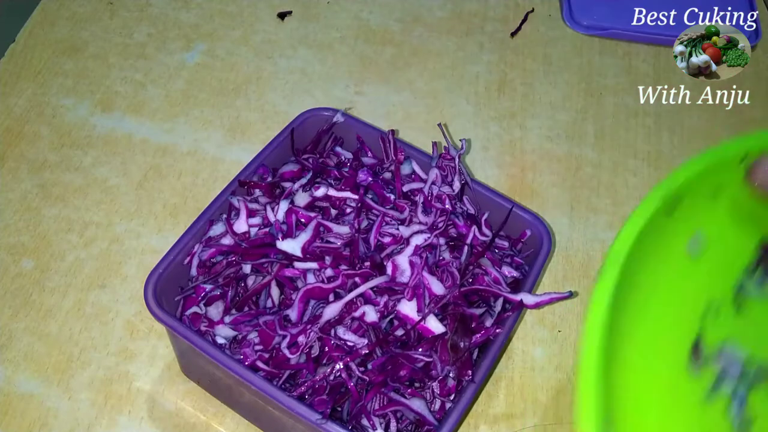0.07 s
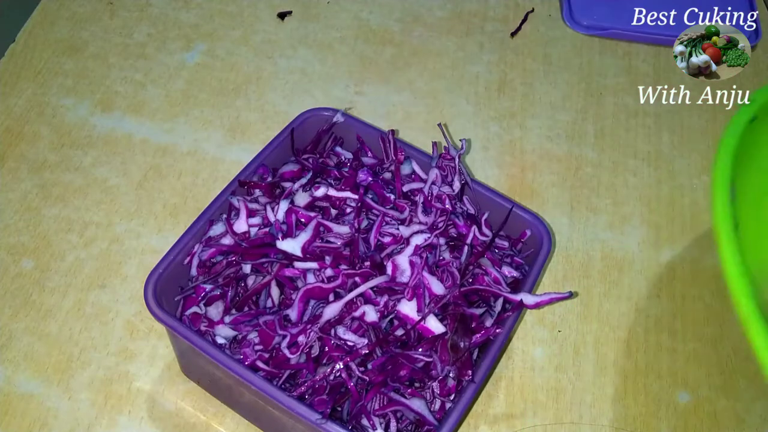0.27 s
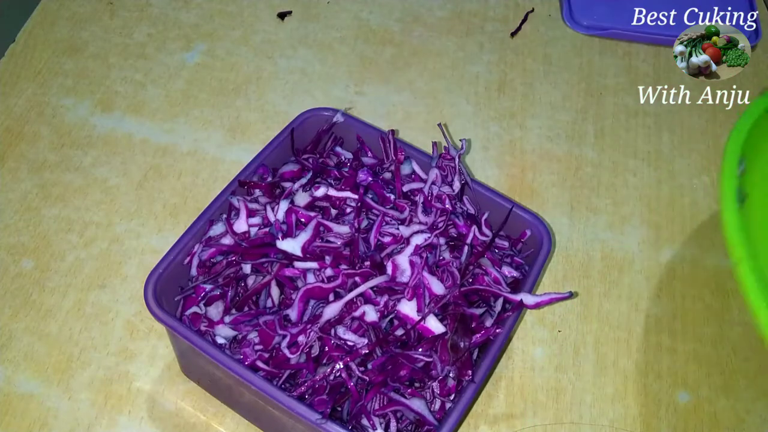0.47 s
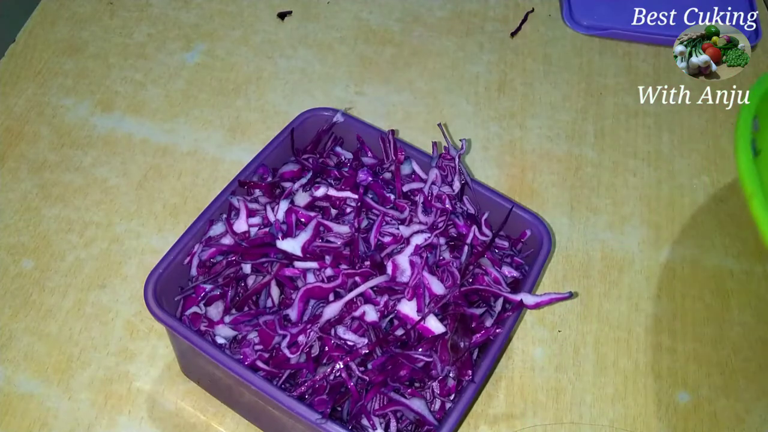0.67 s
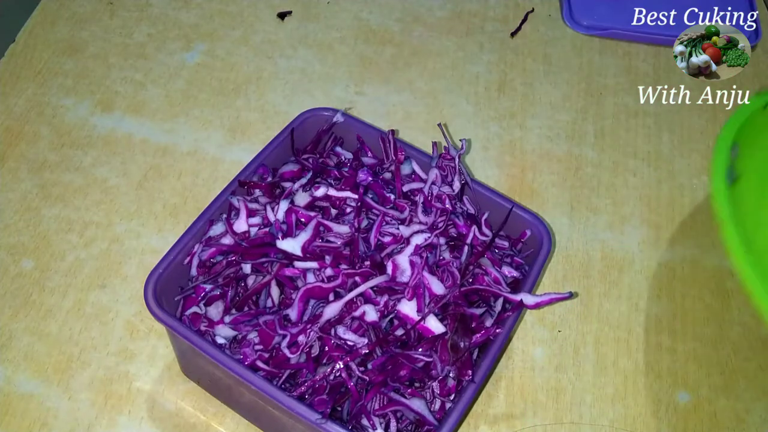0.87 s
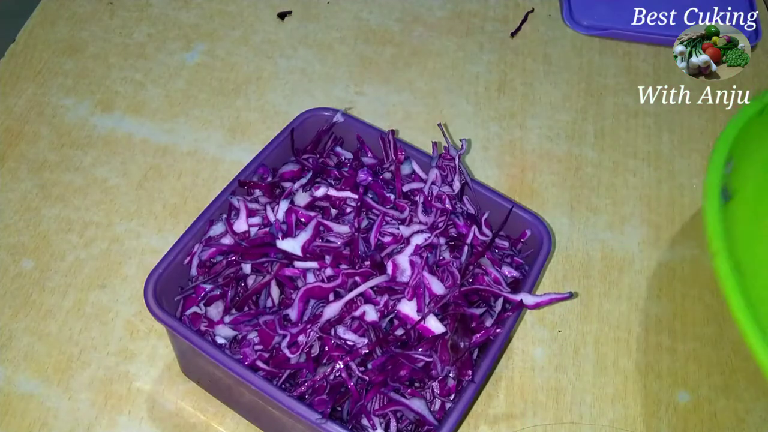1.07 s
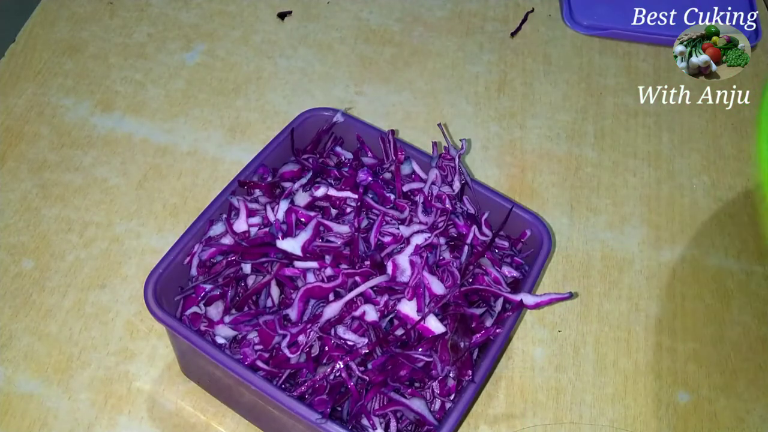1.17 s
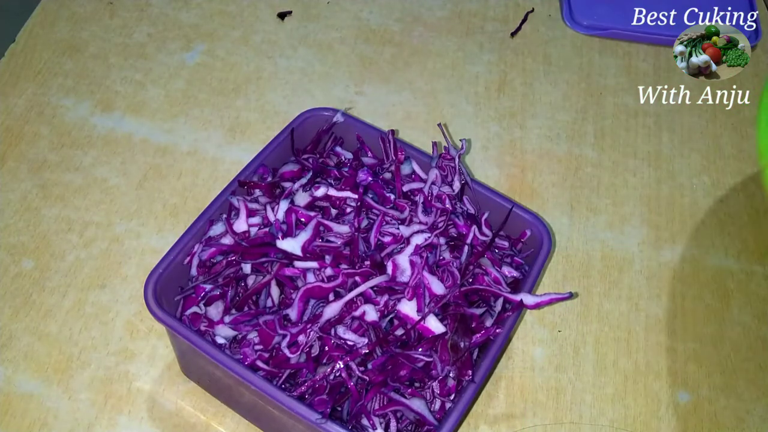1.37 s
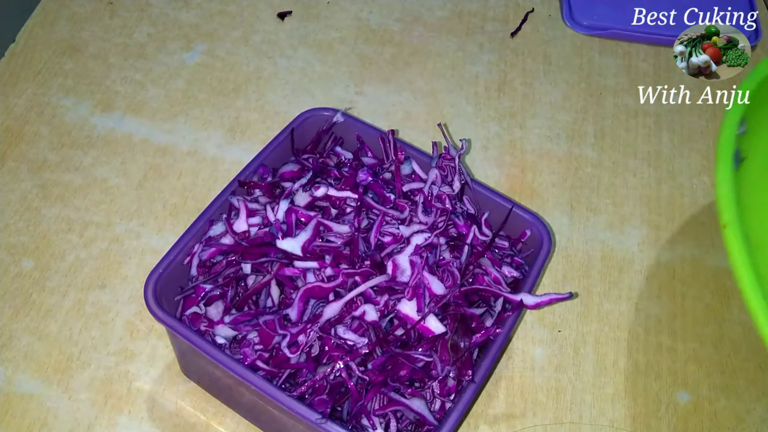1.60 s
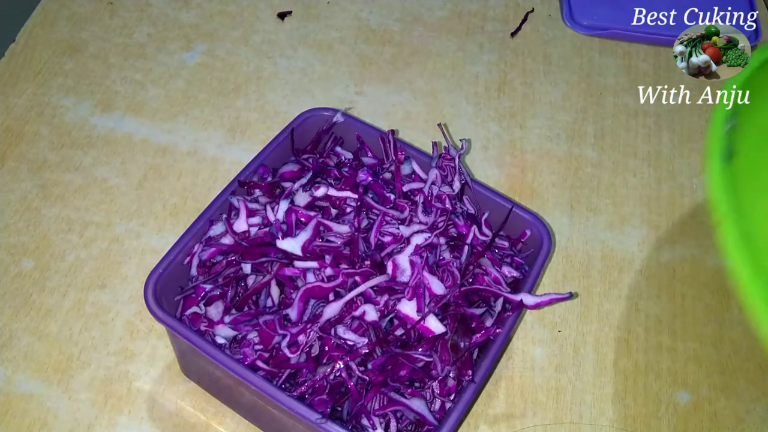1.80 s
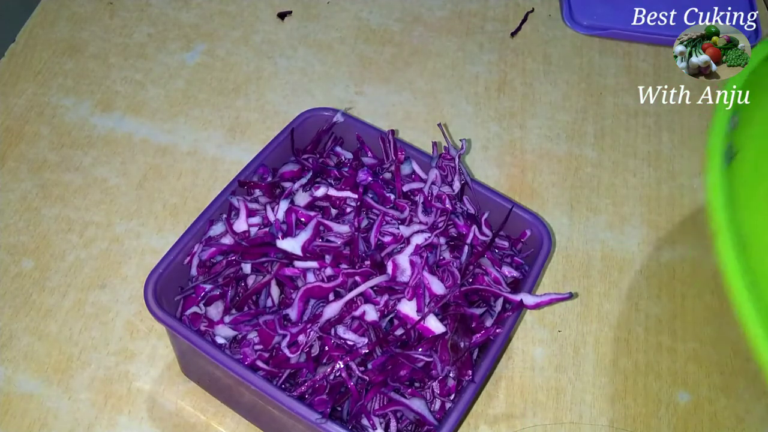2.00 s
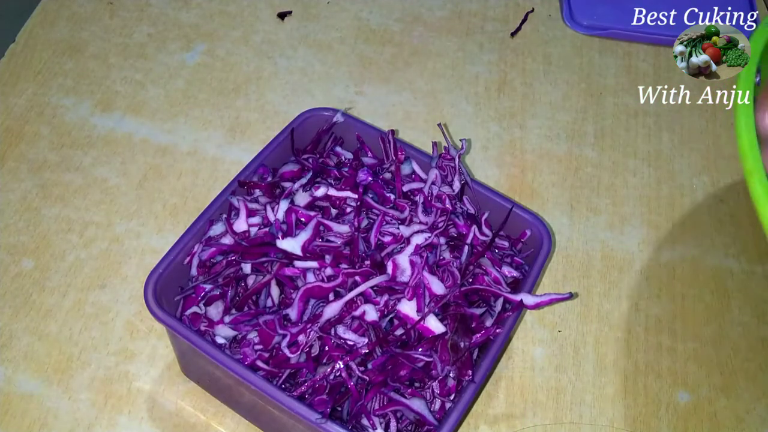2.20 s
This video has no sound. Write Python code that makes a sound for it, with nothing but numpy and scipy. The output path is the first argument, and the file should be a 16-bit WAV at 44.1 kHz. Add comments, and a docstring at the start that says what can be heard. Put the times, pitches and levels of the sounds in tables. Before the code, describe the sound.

Shredded cabbage scraped across a table into a plastic bowl in four gritty strokes, with knocks.

```python
"""Shredded cabbage is swept across a table and into a plastic bowl, in a quiet, humming kitchen.
First the bowl bumps softly on the table and its thin wall is tapped. Then come four strokes, each a
gritty scrape with a hiss above it, made by shreds that stick and slip. Along the way the bowl knocks,
the table rumbles and rubbed plastic sings hollow notes. Two ticks and a few faint notes end the scene.
All of this is in the left channel; the right holds only faint noise."""
import sys
import numpy as np
from scipy import signal
from scipy.fft import rfft, irfft
from scipy.io import wavfile

SR = 44100
rng = np.random.default_rng(int(sys.argv[2]) if len(sys.argv) > 2 else 0)


def wrap_up_sound(samples):
    """Save the sound to the file named by the first command line argument, as 16-bit audio."""
    columns = np.atleast_2d(samples).T
    # keep every value between -1 and 1, then stretch to whole-number steps
    tamed = np.clip(columns, -1, 1)
    steps = np.round(tamed * 32767).astype(np.int16)
    wavfile.write(sys.argv[1], SR, steps)


N = 99225
T, HZ = np.arange(N) / SR, np.fft.rfftfreq(N, 1 / SR) + 1e-3


def amp(db):
    """Turns decibels into a gain."""
    return 10 ** (np.asarray(db) / 20)

def unit(x):
    """Scales a signal to an average (rms) level of 1."""
    return x / np.sqrt(np.mean(x ** 2) + 1e-30)

def read(points, hz):
    """Looks up a table between its rows, on a log-frequency axis."""
    row_hz, value = np.transpose(points)
    return np.interp(np.log(hz + 1), np.log(row_hz + 1), value)

def add(mix, start_s, sound):
    """Mixes a sound in at its start time."""
    part = mix[max(round(start_s * SR), 0):][:len(sound)]
    part += sound[:len(part)]

def shaped(x, gain):
    """Filters by a gain per frequency, then scales to level 1."""
    return unit(irfft(rfft(x) * gain, N))

def above(edge_hz, order=8):
    """Gain that keeps what is above the edge; a negative order keeps what is below."""
    return 1 / np.sqrt(1 + (edge_hz / HZ) ** order)

def wander(rate_hz):
    """Smooth random motion."""
    return unit(signal.sosfilt(signal.butter(2, rate_hz, fs=SR, output="sos"), rng.standard_normal(N)))

def wobble(rate_hz):
    """Random size and phase, to blur a tone into a band of noise."""
    return wander(rate_hz) + 1j * wander(rate_hz)

def swell(peak_s, rise_s, fall_s):
    """A rounded rise and fall."""
    return np.exp(-((T - peak_s) / np.where(T < peak_s, rise_s, fall_s)) ** 2)

def fade(t, ring_s):
    """Dies away by 60 dB in ring_s."""
    return np.exp(-np.log(1000) * t / ring_s)


# tone of the faint background noise, with its highest treble cut away: frequency_hz, gain_db
NOISE_TONE = [(25, -12), (60, -4), (110, 3.5), (160, 3.5), (210, -3.5), (300, -9), (450, -9), (700, -15.5),
              (1500, -20.5), (3000, -28), (6000, -28), (11000, -27.5), (13000, -38), (15000, -62)]
# how loud the low rumble is: time_s, level_db
RUMBLE_LEVELS = [(0, -65), (.14, -75), (.185, -50), (.24, -80), (.63, -88), (.74, -62.5), (.91, -62),
                 (1.15, -69.5), (1.3, -58.5), (1.52, -65), (1.7, -58), (1.9, -70), (2.25, -72)]

def background(hum_hz=147.2, rumble_hz=63.6, rumble_width_hz=23):
    """Faint background noise, a low rumble and a wavering appliance hum."""
    noise = amp(-64.5) * shaped(rng.standard_normal(N), amp(read(NOISE_TONE, HZ)))
    low_band = 1 / (1 + ((HZ - rumble_hz) / rumble_width_hz * 2) ** 2)
    rumble = amp(np.interp(T, *np.transpose(RUMBLE_LEVELS))) * shaped(rng.standard_normal(N), low_band)
    hum = amp(-62.5 + 2.1 * wander(3.4)) * unit(np.sin(2 * np.pi * hum_hz * T))
    return noise + rumble + hum


# tone of the right channel: frequency_hz, gain_db
IDLE_TONE = [(25, -118), (48, -94.5), (65, -87), (145, -90.5), (200, -95), (500, -99), (1200, -102),
             (3200, -102), (6000, -106), (11000, -109), (15000, -117)]

def idle_noise():
    """Faint, steady noise in the channel that the microphone does not feed."""
    return amp(-74.5) * shaped(rng.standard_normal(N), amp(read(IDLE_TONE, HZ)))


# the bowl bumps on the table: start_s, level_db, pitch_hz, ring_s
BOWL_BUMPS = [(0.001, -46.5, 228.6, 0.23), (.022, -50, 283, 0.1), (.065, -50, 210, 0.19),
              (.11, -52, 211, 0.31), (.159, -37, 253.5, 0.088), (.174, -40, 276, 0.075),
              (0.202, -35.5, 214, 0.055)]

def bumps(rise_s=0.004):
    """Dull low notes as the bowl is moved aside."""
    out = np.zeros(N)
    for start_s, level_db, pitch_hz, ring_s in BOWL_BUMPS:
        note = fade(T, ring_s) * np.sin(2 * np.pi * pitch_hz * T)
        add(out, start_s, amp(level_db) * np.minimum(T / rise_s, 1) * note)
    return out


# light taps on the bowl: start_s, level_db
WALL_TAPS = [(0.16, -51.5), (.174, -50.5)]
# notes its wall rings with: pitch_hz, gain_db, ring_s
WALL_NOTES = [(1350, -1, 0.062), (1440, -12, .05), (2110, -8, 0.047), (2550, -10, .05), (3890, -13, 0.16),
              (4850, -9, 0.062), (5570, -6, 0.048), (7800, -3.5, 0.1), (10100, -10, 0.1)]

def taps(rise_s=0.004):
    """Soft touches ring the thin wall of the bowl, each with a scuff of noise."""
    out, t = np.zeros(N), T[T < .2]
    for start_s, level_db in WALL_TAPS:
        ring = sum(amp(gain_db) * fade(t, ring_s) * np.sin(2 * np.pi * (pitch_hz * t + rng.random()))
                   for pitch_hz, gain_db, ring_s in WALL_NOTES)
        scuff = 0.51 * rng.standard_normal(len(t)) * fade(t, ring_s=0.077)
        add(out, start_s, amp(level_db) * np.minimum(t / rise_s, 1) * (ring + scuff))
    return out


# pitches that the bowl makes louder: pitch_hz, width_hz, boost_db
BOWL_RESONANCES = [(688, 140, 11.5), (1080, 200, 3.5), (1314, 46, 3.5), (1800, 180, 1.5), (2250, 300, 4),
                   (2630, 68, 7.5)]

def bowl_hits(rows, size=4096):
    """Each hit is a click and a short rattle, coloured by the bowl."""
    out, t = np.zeros(N), np.arange(size) / SR
    hz = abs(np.fft.fftfreq(size, 1 / SR)) + 1
    bowl_db = sum(boost_db / (1 + (2 * (hz - pitch_hz) / width_hz) ** 2)
                  for pitch_hz, width_hz, boost_db in BOWL_RESONANCES)
    for start_s, peak_db, pitch_hz, width_octaves, ring_s in rows:
        off_pitch_db = -20 * (np.hypot(1, np.log2(hz / pitch_hz) / width_octaves * 1.27) + 0.5)
        log_gain = np.log(amp(bowl_db + off_pitch_db) + 1e-4)
        response = np.exp(np.conj(signal.hilbert(log_gain)))  # rings after the click, not before
        rattle = rng.standard_normal(size) * fade(t, ring_s)
        contact = (t == 0) + 0.6 * rattle / np.linalg.norm(rattle)
        hit = np.fft.ifft(response * np.fft.fft(contact)).real
        add(out, start_s, -amp(peak_db) * hit / abs(hit).max())
    return out


# shreds hit the bowl: start_s, peak_db, pitch_hz, width_octaves, ring_s
SHRED_TICKS = [(.16, -38.5, 7860, 0.71, .07), (.644, -40.5, 6900, 1, 0.023), (.689, -36, 6100, 0.77, 0.05),
               (2.07, -43, 6000, 0.74, 0.021), (2.155, -51.5, 4900, 0.33, 0.066)]

def ticks():
    """Shreds strike the plastic with small, bright ticks."""
    return bowl_hits(SHRED_TICKS)


def slips(spread_db, per_second=9000):
    """Shreds stick and slip, making a stream of tiny, uneven clicks."""
    size = amp(spread_db * np.minimum(rng.exponential(1, N), 4))
    return size * rng.choice([-1., 1.], N) * (rng.random(N) < per_second / SR)

def echoes(count=6, longest_s=0.007, level_db=-13):
    """Quick echoes off the table and bowl lift some frequencies and weaken others."""
    delay_s = longest_s * rng.uniform(0.107, 1, (count, 1))
    bounces = rng.choice([-1, 1], (count, 1)) * np.exp(-2j * np.pi * HZ * delay_s)
    return abs(1 + amp(level_db) / np.sqrt(count) * bounces.sum(0))


# loudness, one list per stroke: time_s, scrape_db, hiss_db
STROKE_LEVELS = [
    [(.2, -55.5, -61), (.225, -41, -55.5), (.25, -41.5, -45.5), (.31, -35.5, -34), (.4, -37.5, -38),
     (.49, -38.5, -40.5), (.57, -43, -52.5), (.625, -46.5, -59.5), (.69, -45.5, -69), (.725, -56.5, -63),
     (.78, -62, -78)],
    [(.78, -68, -71.5), (.83, -58.5, -54), (.87, -58, -54), (.91, -55.5, -49), (1.04, -51.5, -45),
     (1.09, -50.5, -50.5), (1.14, -59, -64.5), (1.18, -72, -77)],
    [(1.294, -69, -66), (1.302, -50, -44.5), (1.34, -55.5, -55.5), (1.4, -46, -44.5), (1.46, -45, -42),
     (1.535, -44, -42), (1.59, -44.5, -47.5), (1.63, -51, -54.5), (1.68, -60.5, -61.5), (1.74, -79, -90)],
    [(1.74, -58.5, -102), (1.79, -51, -68), (1.825, -54, -71.5), (1.86, -47.5, -48), (1.92, -44, -41),
     (1.965, -41, -43), (1.99, -48, -48), (2.03, -54, -54.5), (2.1, -72.5, -74.5), (2.22, -81, -100)],
]
# tone, one list per stroke: frequency_hz, gain_db
STROKE_TONES = [
    [(180, -44), (300, 0), (437, 12), (507, -14), (541, 6), (691, 2), (750, 1), (1350, 1), (1670, -3),
     (2780, -8.5), (5800, -16.5), (10100, -14.5), (15000, -24)],
    [(290, -65), (500, -32), (593, 1), (655, -32), (835, -40), (949, -4), (1030, -39), (1190, 2), (1260, 1),
     (1610, -12), (1770, 0.5), (2020, -5), (2360, -0.5), (3140, -11), (3370, -7), (4670, -11.5),
     (5780, -14.5), (10200, -12), (15000, -19)],
    [(180, -42), (300, -20), (359, -20), (390, -4), (437, 18), (559, -9), (597, -8), (637, -4), (855, -10),
     (898, -36), (975, -3), (1210, -10.5), (1420, -2), (1700, -4), (2480, -6.5), (4180, -10.5), (8050, -13),
     (10500, -9.5), (15000, -21)],
    [(180, -52), (300, -25), (444, 1), (498, -5), (587, 13), (738, -34), (828, -31), (898, -4.5),
     (1060, -5), (1910, -5.5), (2250, -6.5), (2920, -7), (5530, -13), (9800, -13), (15000, -20)],
]

def strokes(scrape_low_hz=800, hiss_low_hz=3560, top_hz=11600, judder_hz=70, judder_db=0.99):
    """Slipping shreds make a scrape and a hiss that dulls as the hand slows; both judder."""
    out = np.zeros(N)
    for levels, tone in zip(STROKE_LEVELS, STROKE_TONES):
        time_s, scrape_db, hiss_db = np.transpose(levels)
        scrape_db, hiss_db = np.interp(T, time_s, scrape_db), np.interp(T, time_s, hiss_db)
        colour = amp(read(tone, HZ)) * echoes()
        grit = unit(rng.uniform(-0.98, 1, N) * (rng.random(N) < 260 / SR))  # larger catches
        scrape_band = above(scrape_low_hz, order=12) * above(hiss_low_hz, order=-8)
        scrape = shaped(unit(slips(spread_db=4)) + amp(-8) * grit, colour * scrape_band)
        hiss = shaped(slips(spread_db=2), colour * above(hiss_low_hz))
        top = irfft(rfft(hiss) * above(top_hz, order=16) ** 2, N)
        hiss -= top * (1 - amp(0.2 * (hiss_db - hiss_db.max())))  # the highest part fades fastest
        out += (scrape * amp(scrape_db) + hiss * amp(hiss_db)) * (T > time_s[0]) * (T < time_s[-1])
    return out * amp(judder_db * wander(judder_hz))

def drifting(x, depth_db=2.5, patch_hz=190, patch_s=0.083, size=1024):
    """The tone shifts in random patches as the contact moves over the surface."""
    hz, t, spectrum = signal.stft(x, SR, nperseg=size)
    blur_hz = np.exp(-((hz[:, None] - hz) / patch_hz * 2) ** 2)
    blur_time = np.exp(-((t[:, None] - t) / patch_s) ** 2)
    patches = unit(blur_hz @ rng.standard_normal(spectrum.shape) @ blur_time)
    gain = unit(amp(depth_db * np.clip(patches, -2, 2)))
    return signal.istft(spectrum * gain, SR, nperseg=size)[1][:N]


# the bowl knocks: start_s, peak_db, pitch_hz, width_octaves, ring_s
BOWL_KNOCKS = [(.208, -36.5, 1930, 0.58, .02), (.2172, -18.5, 1240, 1.24, 0.012),
               (.2245, -29, 1420, 1.4, .02), (.2318, -27, 1230, 1.43, 0.022), (.2783, -23, 1170, 1.5, .02),
               (.3026, -22, 1090, 1.4, 0.014), (.3245, -24, 2310, 0.73, 0.029),
               (.3305, -26, 1490, 1.8, 0.024), (.3525, -23.5, 1100, 0.76, 0.014),
               (.3585, -20.5, 2800, 1.4, 0.0073), (.3735, -30, 905, 0.9, 0.014), (.382, -38, 1100, 1, .02),
               (.5045, -28, 1120, 0.67, 0.027), (.5365, -27, 1290, 2.3, 0.019),
               (.5555, -28, 2000, 1.14, 0.013), (.6072, -22.5, 1050, 1.6, 0.016),
               (.6175, -29, 950, 0.74, .01), (.649, -35, 1340, 2.3, .015), (.7495, -39, 1230, 0.41, 0.015),
               (1.088, -41.5, 940, 0.43, 0.025), (1.12, -39, 1080, 0.49, 0.034),
               (1.1545, -34.5, 955, 0.47, 0.06), (1.2966, -28, 1480, 1.4, .025),
               (1.3025, -28.5, 1300, 1.14, .03), (1.398, -33.5, 1200, 0.57, 0.019),
               (1.5845, -18, 4970, 2.1, .025), (1.7475, -33.5, 1860, 1.03, .025),
               (1.7505, -35, 1680, 0.96, 0.017), (1.7855, -36.5, 1430, 0.89, 0.028),
               (1.8305, -31.5, 1140, 0.75, 0.015), (1.9585, -30, 800, 1.7, 0.028)]

def knocks():
    """The plastic bowl is knocked and rings very briefly."""
    return bowl_hits(BOWL_KNOCKS)


# the bowl shifts: peak_s, rise_s, fall_s, level_db, pitch_hz, width_hz
BOWL_SHUFFLES = [(.23, 0.026, .04, -50.5, 235, 70), (.525, 0.042, .04, -50, 280.5, 101),
                 (0.731, 0.047, 0.0089, -57, 218.5, 90), (.84, 0.02, 0.022, -56, 271, 198),
                 (1.05, 0.11, 0.048, -61, 222.7, 59), (1.419, 0.029, 0.011, -51.5, 210, 62),
                 (1.8, .012, .03, -58, 228.2, 70)]

def shuffles():
    """The bowl shuffles against the table in short, dull swells of noise."""
    out = np.zeros(N)
    for peak_s, rise_s, fall_s, level_db, pitch_hz, width_hz in BOWL_SHUFFLES:
        band = wobble(width_hz / 2) * np.exp(2j * np.pi * pitch_hz * T)
        out += amp(level_db) * swell(peak_s, rise_s, fall_s) * band.real
    return out


# the hand presses down: peak_s, rise_s, fall_s, level_db
HAND_PRESSES = [(.3, 0.064, 0.18, -49), (0.479, 0.16, 0.25, -43.5), (.665, 0.035, 0.051, -55),
                (1.025, 0.081, .03, -66.5), (1.31, .012, 0.19, -62.5), (1.55, 0.072, 0.062, -48),
                (1.965, 0.061, .04, -52)]
# tone of the table top: frequency_hz, gain_db
TABLE_TONE = [(150, -28), (200, 6), (260, -4), (330, -19), (400, -1.5), (470, -4.5), (545, 3), (620, -2.5),
              (720, -5), (1000, -1)]

def table_rumble(low_hz=350, high_hz=840):
    """Under the hand's pressure the slipping shreds also shake the table."""
    force = np.sqrt(sum((amp(level_db) * swell(*timing)) ** 2 for *timing, level_db in HAND_PRESSES))
    colour = amp(read(TABLE_TONE, HZ)) * above(low_hz, order=4) * above(high_hz, order=-12)
    return force * shaped(slips(spread_db=4), colour)


# rubbed plastic sings: peak_s, rise_s, fall_s, level_db, pitch_hz, glide_octaves_per_s, width_hz
RUB_NOTES = [(0.318, 0.03, 0.14, -48, 409.4, -1, 34.6), (0.359, 0.026, 0.048, -43.5, 555, 3.5, 30.3),
             (0.661, 0.043, 0.045, -51, 550.5, 1, 30.2), (0.801, .008, 0.042, -50.5, 1220, -1, 165),
             (.96, 0.069, 0.035, -55.5, 1300, -0.5, 110), (1.125, 0.037, 0.084, -53, 1030, -3.5, 167),
             (1.179, 0.013, 0.016, -53.5, 780, -3, 110), (1.199, 0.034, 0.035, -59.5, 415, 5.5, 35.3),
             (.925, .03, 0.025, -49.5, 4630, 3, 500), (0.999, 0.067, .1, -66, 2386, -1.5, 180),
             (1.001, 0.07, 0.092, -64, 1780, 0, 100), (1.026, 0.015, 0.012, -55.5, 589, 1, 35),
             (1.304, 0.0034, 0.11, -54.5, 685, 0.5, 70), (1.303, 0.0041, 0.13, -50.5, 1199, -1, 260),
             (1.509, 0.058, 0.025, -44, 1619, -1, 450), (1.55, 0.026, 0.03, -48, 600, -1, 131),
             (1.51, 0.047, .06, -53.5, 430.6, -0.5, 100.3), (1.715, 0.02, 0.034, -47, 457.6, -2.5, 35),
             (1.716, .025, 0.032, -55.5, 560.6, -2.5, 90), (1.729, .03, 0.018, -58.5, 800, 5.5, 110),
             (1.715, .025, 0.023, -60.5, 1930, 0.5, 250), (1.786, .012, .012, -53, 1673, -0.5, 450),
             (1.925, 0.055, 0.027, -49, 3010, 1.5, 1100), (1.805, 0.015, 0.029, -55.5, 600, -0.5, 70),
             (1.879, 0.058, 0.18, -57, 455, -2, 40.2), (2.091, 0.051, 0.026, -51, 458, -0.5, 22.1),
             (2.168, .06, 0.026, -57, 630, 1, 62), (2.189, 0.029, 0.028, -60, 450, 0.5, 40.2)]

def rubs(roughness=0.4, chatter_hz=80):
    """Each rub keeps one hollow note of the bowl going, with a little chatter."""
    out = np.zeros(N)
    for peak_s, rise_s, fall_s, level_db, pitch_hz, glide, width_hz in RUB_NOTES:
        ring = wobble(width_hz / 2)
        ring /= (abs(ring) + 0.082) ** 0.49  # partly evens out the loudness
        chatter = 1 + roughness * wobble(chatter_hz) / np.sqrt(2)
        gliding_hz = pitch_hz * 2 ** (glide * np.clip(T - peak_s, -2 * rise_s, 2 * fall_s))
        force = swell(peak_s, rise_s, fall_s)
        note = force * (chatter * ring * np.exp(2j * np.pi * np.cumsum(gliding_hz) / SR)).real
        out += amp(level_db) * note * np.linalg.norm(force) / np.linalg.norm(note)
    return out


# how long the kitchen rings: frequency_hz, ring_s
KITCHEN_RING = [(200, 0.22), (1000, 0.27), (4000, 0.34), (14000, 0.074)]

def room(x, level_db=-11):
    """The kitchen adds a short, faint echo."""
    hz, t, noise = signal.stft(rng.standard_normal(16384), SR, nperseg=256)
    tail = signal.istft(noise * fade(t, read(KITCHEN_RING, hz)[:, None]), SR, nperseg=256)[1]
    return x + amp(level_db) * signal.fftconvolve(x, tail / np.linalg.norm(tail))[:N]


def scene():
    """The kitchen on the left, faint noise on the right."""
    action = drifting(strokes()) + shuffles() + taps() + table_rumble() + rubs()
    action += knocks() + ticks() + bumps()
    return np.array([room(action) + background(), idle_noise()])

def record(dry):
    """Cuts the treble above 15600 Hz."""
    low_pass = signal.firwin(511, 15600, window=("kaiser", 9), fs=SR)
    return signal.oaconvolve(dry, low_pass[None], "same")


dry = scene()
out = record(dry)
wrap_up_sound(out)
```